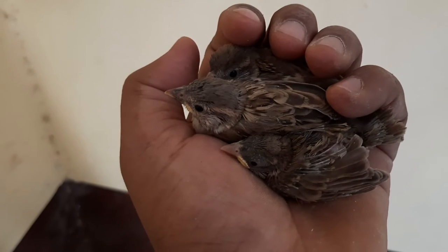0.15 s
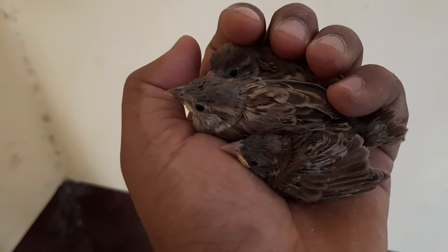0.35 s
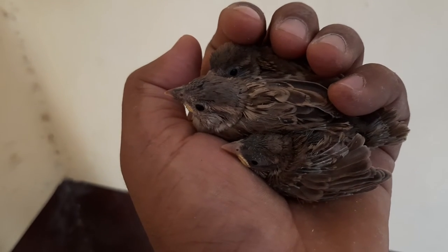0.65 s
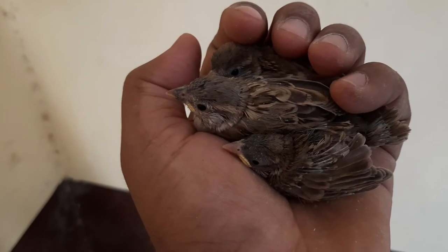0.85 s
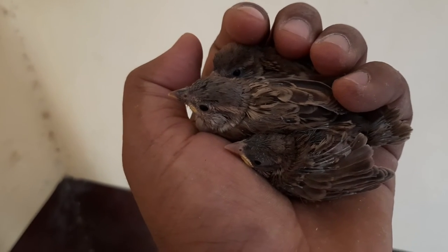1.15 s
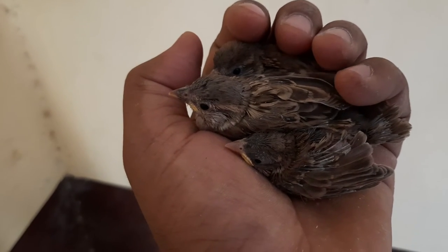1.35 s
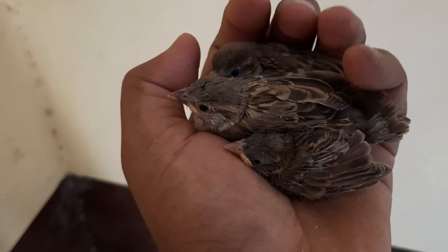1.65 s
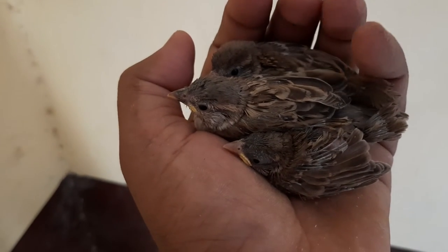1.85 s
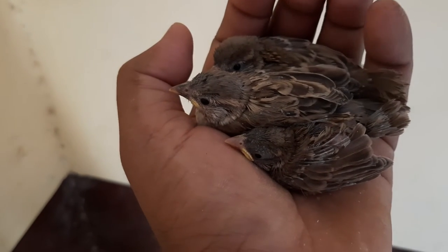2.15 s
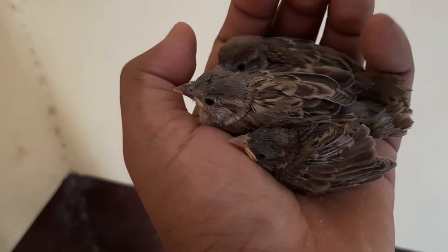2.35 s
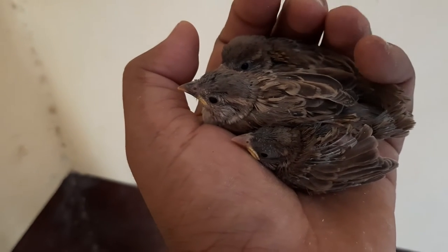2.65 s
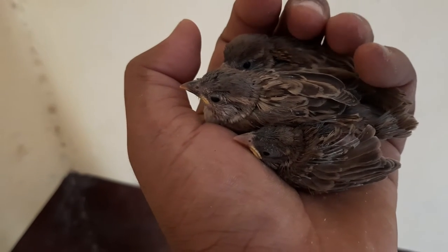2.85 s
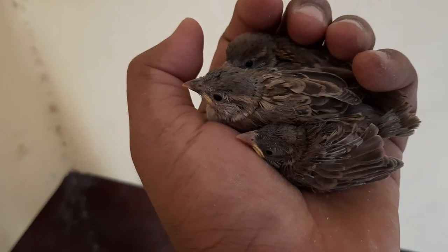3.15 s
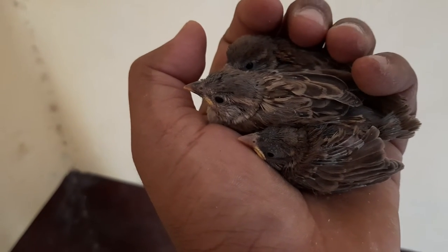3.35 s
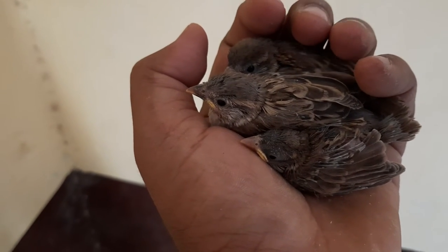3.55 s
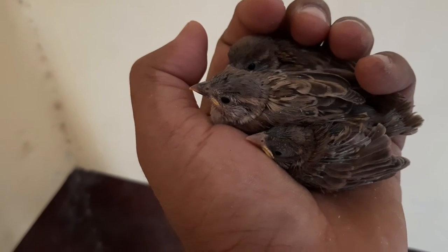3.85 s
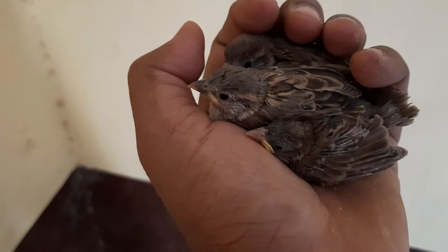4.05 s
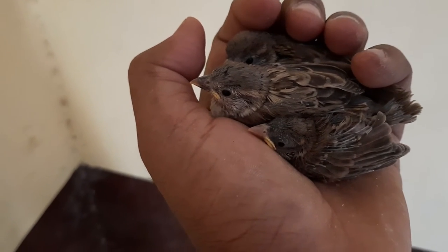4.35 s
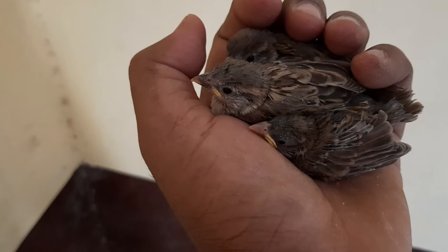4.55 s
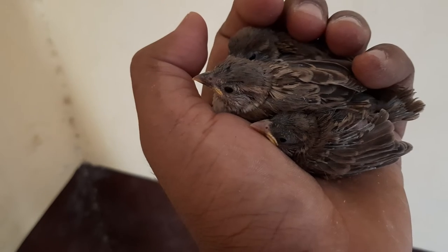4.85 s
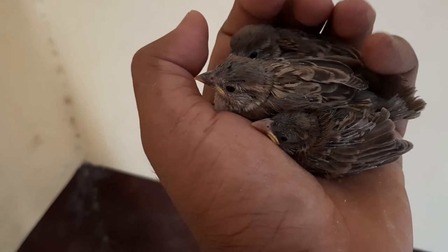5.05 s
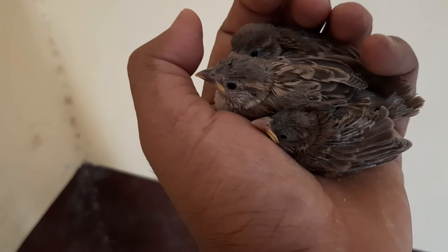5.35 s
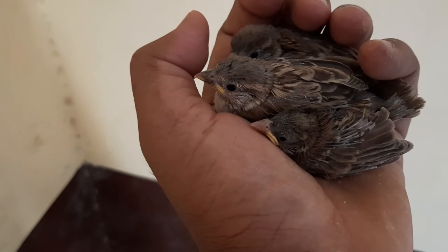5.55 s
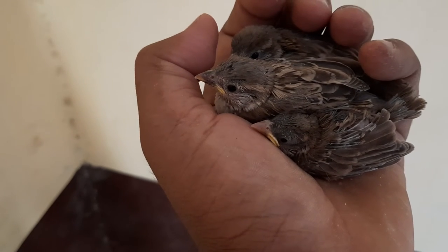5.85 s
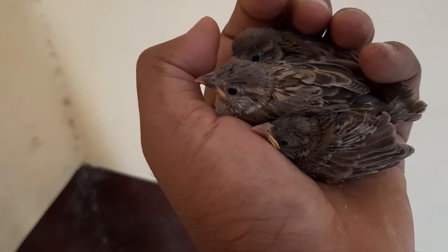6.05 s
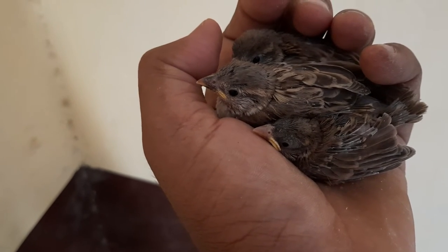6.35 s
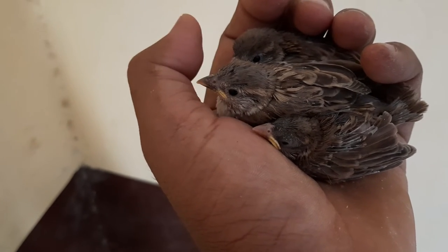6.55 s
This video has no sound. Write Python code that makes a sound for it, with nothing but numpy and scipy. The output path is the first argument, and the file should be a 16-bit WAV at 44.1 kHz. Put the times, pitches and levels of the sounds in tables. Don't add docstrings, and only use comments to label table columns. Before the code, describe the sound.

A bare, echoing room, heard through a stereo phone microphone. The tail of an earlier chirp fades over a soft, low hum. At 0.75 s a young sparrow gives a soft high cheep, leaping up and gliding down, followed by a harsh, lower pair of chirps at 0.9 and 1.1. A loud clear cheep comes at 1.35, a fainter, farther peep at 1.65. Then a pause as the echoes die. A second raspy pair at 3.1 and 3.3 runs into the loudest, shortest cheep at 3.4. After another gap, a faint peep at 4.3, a longer soft cheep at 4.7 overlapping a third harsh pair, and a middling cheep at 5.25. A small peep at 6.3 leads to the last raspy pair at 6.4 and 6.6. Thin whistles lead into the clear calls; the hum swells slightly with the birds, and a distant dove coos very faintly throughout.

```python
import sys
import numpy as np
from scipy import signal
from scipy.fft import rfft, irfft
from scipy.io import wavfile
from scipy.ndimage import uniform_filter1d

SR = 44100
rng = np.random.default_rng(int(sys.argv[2]) if len(sys.argv) > 2 else 0)


def int16_out(signal):
    q = np.round(np.clip(np.atleast_2d(signal).T, -1, 1) * 32767)
    wavfile.write(sys.argv[1], SR, q.astype(np.int16))


def level_to_linear(level):
    exponent = np.asarray(level, float) / 20
    return 10 ** exponent


N = 295029

# frequency in Hz, gain in dB.
CLEAR_THROAT = [(900, -47.5), (2300, -17.5), (3200, -7), (4700, -3), (5600, -0.5), (7000, 2.5),
                (8200, -11.5), (10300, -9), (12500, -9.5), (16000, -9.5)]


def evened(x):
    return x / np.sqrt(np.mean(x ** 2) + 1e-20)


def smooth_twice(x, size):
    return uniform_filter1d(uniform_filter1d(x, size=size), size=size)


def read_at(points, hz):
    f, value = np.transpose(points)
    return np.interp(np.log(hz + 1), np.log(f + 1), value)


def mix_in(mix, start_s, sound):
    part = mix[round(start_s * SR):][:len(sound)]
    part += sound[:len(part)]


def coloured(x, points):
    hz = np.fft.rfftfreq(len(x), 1 / SR)
    return irfft(rfft(x) * level_to_linear(read_at(points, hz)), len(x))


def call(row, shape, beak, quaver, throat, count, slope_db, second_db, quaver_hz, waver, half_db,
         breath_db):
    start_s, level_db, pitch, length, extra_db = row
    point_s, point_hz, point_db = np.transpose(shape)
    noise = rng.standard_normal((2, 9000))
    t = np.arange(0, min(point_s[-1] * length, .2), 1 / SR)
    through = t / t[-1]
    hz = uniform_filter1d(np.interp(t, point_s * length, point_hz), size=200, mode="nearest")
    effort_db = uniform_filter1d(np.interp(t, point_s * length, point_db), size=200, mode="nearest")

    lift_start_db, lift_end_db, bend, octave_swell_db = beak
    lift_db = lift_start_db + (lift_end_db - lift_start_db) * through ** bend

    opening, full, settle_s = quaver
    depth = opening + (full - opening) * np.minimum(t / length / settle_s, 1) ** 2
    shake = evened(smooth_twice(noise[0], 60))[:len(t)]
    hz = pitch * hz * (1 + depth * np.sin(2 * np.pi * quaver_hz * t) + waver * shake)
    turns = 2 * np.pi * np.cumsum(hz) / SR

    order = np.arange(1, 2 * count + 1)[:, None] / 2
    share_db = np.where(order % 1, half_db, second_db) + slope_db * (order - 2)
    share_db = share_db + lift_db * abs(order - 1) + extra_db
    share_db[3:4] += octave_swell_db * (through - .5)
    share_db[1] = 0
    line_hz = order * hz
    line_gain = level_to_linear(share_db + read_at(throat, line_hz)) * (line_hz < SR / 2)
    voice = (line_gain * np.sin(order * turns + order ** 2)).sum(0)

    air_gain = level_to_linear(breath_db + 2 * lift_db + extra_db)
    air = air_gain * coloured(noise[1], throat)[:len(t)] * (1 + np.cos(turns))
    return start_s, level_to_linear(level_db + effort_db) * (voice + air) * signal.windows.tukey(len(t), .1)


def sparrow(calls, **voice):
    out = np.zeros(N)
    for row in calls:
        mix_in(out, *call(row, **voice))
    return out


def lead_ins(calls, below_db):
    # time in s, pitch in Hz, effort in dB.
    shape = [(0, 7750, -30), (.036, 6400, -4), (.055, 6700, -11), (.07, 6940, -21.5)]
    rows = [(start_s - .008, level_db + below_db, *rest) for start_s, level_db, *rest in calls]
    return sparrow(rows, shape=shape, throat=CLEAR_THROAT,
                   beak=(-9.5, -9, 1.5, 0), quaver=(0.021, .06, 0.02915), quaver_hz=196.6, waver=0.083,
                   count=1, slope_db=-2.5, second_db=-30, half_db=-36.5, breath_db=-27)


def near_cheeps():
    # time in s, pitch in Hz, effort in dB.
    shape = [(0, 3600, -51.5), (.027, 3050, -24), (.04, 3900, -7), (.054, 4735, -4.5), (.098, 4598, -2.5),
             (.116, 4024, -3), (.14, 3003, -13.5)]
    # start in s, level in dB, pitch factor, length factor, extra overtones in dB.
    calls = [
        (.745, -20.5, 1, 0.8, -5),
        (1.348, -15, 1.016, 0.84, -4),
        (3.376, -14.5, 1.007, 0.77, -2.8),
        (4.68, -20.5, 1.01, 1.3, -6.5),
        (5.264, -17.5, 1.015, 1.013, -5),
    ]
    cheeps = sparrow(calls, shape=shape, throat=CLEAR_THROAT,
                     beak=(2.5, -5, 2.5, 0), quaver=(.03, 0.085, .05), quaver_hz=128.4, waver=.012,
                     count=4, slope_db=-4.0, second_db=-15.5, half_db=-19, breath_db=-27.0)
    return cheeps + lead_ins(calls, -16)


def far_peeps():
    # time in s, pitch in Hz, effort in dB.
    shape = [(0, 3658, -36), (.02, 4200, -19), (.032, 4800, -2.5), (.055, 4443, 1.5), (.07, 4150, -13),
             (.1, 3850, 0.5), (.145, 3043, -8), (.178, 2150, -12)]
    # start in s, level in dB, pitch factor, length factor, extra overtones in dB.
    calls = [
        (1.653, -31.5, 1.013, 0.67, -2.5),
        (2.68, -79.5, .85, 0.95, -5),
        (4.268, -36.5, 1.01, 0.86, -3.5),
        (6.298, -34.5, 1.002, 0.71, -5.5),
    ]
    peeps = sparrow(calls, shape=shape, throat=CLEAR_THROAT,
                    beak=(0.36, -1, 1.6, 0.33), quaver=(0.15, 0.049, 0.057), quaver_hz=110.26, waver=0.018,
                    count=4, slope_db=-8, second_db=-17.5, half_db=-22, breath_db=-25.5)
    return peeps + lead_ins(calls, -21)


def harsh_chirps():
    # time in s, pitch in Hz, effort in dB.
    shape = [(0, 1044, -14.5), (.012, 1334, -6), (.028, 1756, -6.5), (.044, 1796, -6.5), (.07, 1399, -3.5),
             (.096, 1150, -9), (.116, 948, -14.5)]
    # start in s, level in dB, pitch factor, length factor, extra overtones in dB.
    calls = [
        (.916, -29.5, 0.94, 0.88, -0.2),
        (1.072, -31, 1.06, .99, -0.5),
        (3.122, -32.5, 0.97, .99, -0.4),
        (3.262, -29.5, 1.03, .95, 0.35),
        (4.766, -32.5, 0.97, 1.01, 1.4),
        (4.9, -31, 1.04, .99, 1.3),
        (6.412, -32, 0.95, 1, .6),
        (6.568, -32, 1.005, 0.8, 0.31),
    ]
    # frequency in Hz, gain in dB.
    harsh_throat = [(500, -62.5), (950, -8.5), (1300, -11.5), (1800, -9), (2400, -2.5), (3000, 4),
                    (4500, 0.5), (6500, -5.5), (8200, -20.5), (9500, -35), (12000, -22.5), (16000, -54)]
    return sparrow(calls, shape=shape, throat=harsh_throat,
                   beak=(3.0, -9.5, 1.45, 15), quaver=(.065, 0.0081, 0.036), quaver_hz=123.3, waver=.011,
                   count=12, slope_db=-0.5, second_db=-2.5, half_db=-23.0, breath_db=-11.0)


def room(x, direct_db, build_s, sing_db):
    # frequency in Hz, t60 in s.
    walls = [(1000, 1.27), (2000, 1), (3000, 0.74), (4500, 0.57), (7000, 0.41), (10000, 0.35),
             (15000, 0.31)]
    # frequency in Hz, width in Hz, extra share of t60.
    rings = [(1350, 67, .15), (1890, 67, .3), (3000, 150, .2), (3880, 64, .26), (4400, 74, .18),
             (4660, 93, .25), (5090, 107, .2)]
    # frequency in Hz, likeness from -1 to 1.
    echo_same = [(450, .7), (800, -.3), (1300, -.6), (2200, 0), (16000, 0)]
    # frequency in Hz, left minus right in dB.
    ports = [(1000, 0.5), (2500, 0), (4500, -4), (6500, -3), (9000, 4.5), (13000, 2.5)]
    early_db, early_s = -0.5, .03

    echoes = rng.standard_normal((2, SR + SR // 4))
    hz, t, z = signal.stft(echoes, SR, nperseg=512, noverlap=384)
    same = read_at(echo_same, hz)[:, None]
    z[1] = same * z[0] + np.sqrt(1 - same ** 2) * z[1]
    longer = sum(extra * np.exp(-((hz - f) / width) ** 2) for f, width, extra in rings)
    t60 = read_at(walls, hz) * (1 + longer)
    lean_db = np.multiply.outer([.5, -.5], read_at(ports, hz))[:, :, None]
    z = z * level_to_linear(lean_db - 60 * t / t60[:, None])
    tail = signal.istft(z, SR, nperseg=512, noverlap=384)[1]

    s = np.arange(tail.shape[1]) / SR
    for (f, _, extra), phase in zip(rings, rng.random((len(rings), 2, 1))):
        fade_db = -60 * s / (read_at(walls, f) * (1 + extra))
        tail += level_to_linear(sing_db + fade_db) * np.sin(2 * np.pi * (f * s + phase))
    tail *= (1 - np.exp(-s / build_s)) * level_to_linear(early_db * np.exp(-s / early_s))
    tail /= np.sqrt((tail ** 2).sum() / 2)
    tail[[0, 1], [3, 0]] = level_to_linear(direct_db)
    return signal.fftconvolve(x[None], tail, axes=1)[:, :N]


def earlier_call(level_db, t60_s):
    # frequency in Hz, gain in dB.
    colour = [(700, -34), (1200, -7), (2400, -9), (3030, 0.5), (3600, -2.5), (3880, 8), (4100, -4.5),
              (4400, -1.5), (4900, -6), (5400, -17), (7000, -24), (9000, -46.5)]
    out, t = np.zeros((2, N)), np.arange(SR) / SR
    fade = level_to_linear(level_db - 60 * t / t60_s)
    out[:, :SR] = [evened(coloured(noise, colour)) * fade for noise in rng.standard_normal((2, SR))]
    return out


def dove():
    # start in s, length in s, pitch in Hz, level in dB.
    coos = [(0.77, 0.53, 584, -65.5), (1.353, 0.38, 562, -72.5), (2.02, 0.15, 560, -72),
            (2.24, 0.089, 559, -75.5), (2.399, 0.13, 560, -64), (2.567, .07, 556, -67),
            (2.694, 0.059, 558, -65.5), (3.021, 0.25, 557, -66.5), (3.639, 0.2, 545, -66.5),
            (3.983, 0.42, 558, -70), (4.657, 0.29, 542, -67.5), (5.3, 0.26, 537, -63.5),
            (5.598, 0.38, 539, -62), (6.33, 0.3, 528, -64.5)]
    out = np.zeros(N)
    for start_s, length_s, hz, level_db in coos:
        t = np.arange(0, length_s, 1 / SR)
        note = np.sin(2 * np.pi * hz * t) * signal.windows.tukey(len(t), .6)
        mix_in(out, start_s, np.sqrt(2) * level_to_linear(level_db) * note)
    flutter = evened(smooth_twice(rng.standard_normal((2, N)), 1500))
    return out * level_to_linear(2.3 * flutter + [[2.5], [-2.5]])


def gate(birds):
    shut_db, open_db, rise_s, fall_s = -65, -29, 0.19, .07
    power = uniform_filter1d((birds ** 2).mean(0), size=512)[::256]
    level_db = 10 * np.log10(abs(power) + 1e-12)
    wanted = np.clip((level_db - shut_db) / (open_db - shut_db), 0, 1)
    opened, now = [], wanted[0]
    for want in wanted:
        now += (want - now) * 256 / SR / (rise_s if want > now else fall_s)
        opened.append(now)
    return np.array(opened)


def hum(opened):
    # frequency in Hz, level in dB per Hz.
    spectrum = [(28, -33), (42, -10.5), (65, -3), (150, -8), (300, -2), (480, 0), (700, -7.5),
                (1200, -11.5), (2200, -16.5), (3500, -28.5), (7000, -26.5), (9500, -46), (12500, -29.5),
                (16000, -29.5)]
    # frequency in Hz, width in Hz, gain in dB.
    lines = [(310, 30, 6), (402, 25, 4), (78, 25, 1)]
    # frequency in Hz, likeness from -1 to 1.
    likeness = [(30, .93), (200, .88), (350, .93), (520, .5), (1200, -.2), (5000, .01)]
    # frequency in Hz, left minus right in dB.
    lean = [(60, 2.6), (250, 2.6), (550, 4.5), (1650, -2.0), (4970, -2.5), (15000, 2.0)]
    level_db, gate_range_db = -17.5, 9

    frames, hz = N // 256 + 5, np.fft.rfftfreq(1024, 1 / SR)
    a, b, c, d, patches = rng.standard_normal((frames, 513, 5)).T
    patches = uniform_filter1d(patches, size=6, axis=0)
    patches = evened(uniform_filter1d(patches, size=14, axis=1))
    swell_db = gate_range_db * np.pad(opened, (0, frames), "edge")[:frames] - 4.5
    low = 1 / (1 + (hz / 530.0) ** 4) / (1 + (240.0 / (hz + 1)) ** 2)

    same, left = np.clip(read_at(likeness, hz), -1, 1)[:, None], a + 1j * b
    z = np.array([left, same * left + np.sqrt(1 - same ** 2) * (c + 1j * d)])
    lean_db = np.multiply.outer([.5, -.5], read_at(lean, hz))[:, :, None]
    lines_db = sum(db * np.exp(-((hz - f) / width) ** 2) for f, width, db in lines)
    colour_db = (read_at(spectrum, hz) + lines_db)[:, None]
    z *= level_to_linear(level_db - 57.0 + colour_db + lean_db + 2.1 * patches + np.outer(low, swell_db))
    return signal.istft(z, nperseg=1024, noverlap=768)[1][:, :N]


def scene():
    near = room(near_cheeps(), direct_db=-16, build_s=0.003, sing_db=-26)
    far = room(far_peeps(), direct_db=-17, build_s=0.013, sing_db=-22)
    harsh = room(harsh_chirps(), direct_db=-17.5, build_s=0.0048, sing_db=-23)
    birds = level_to_linear(7.5) * (near + far + harsh) + earlier_call(-51.5, t60_s=0.78)
    return birds + dove() + hum(gate(birds))


def roll_off(x):
    return signal.sosfilt(signal.butter(12, 15910, fs=SR, output="sos"), x)


def record(dry):
    bass_cut = signal.butter(3, 36, "highpass", fs=SR, output="sos")
    treble_cut = signal.firwin(511, 15860, window=("kaiser", 9), fs=SR)
    mix = signal.oaconvolve(signal.sosfilt(bass_cut, dry), treble_cut[None], "same")
    return roll_off(mix)


dry = scene()
out = record(dry)
int16_out(out)
```